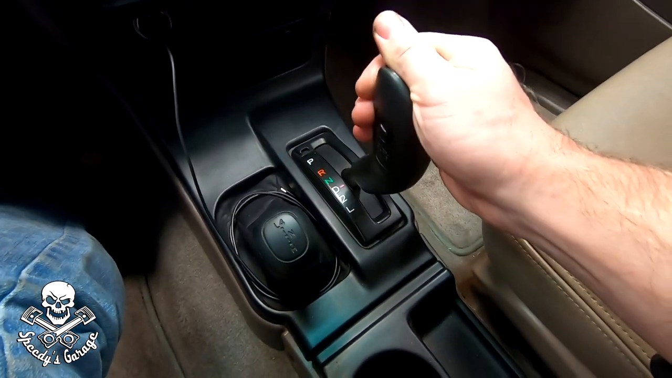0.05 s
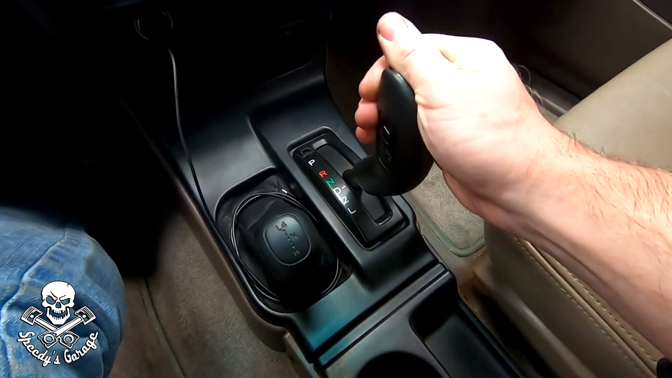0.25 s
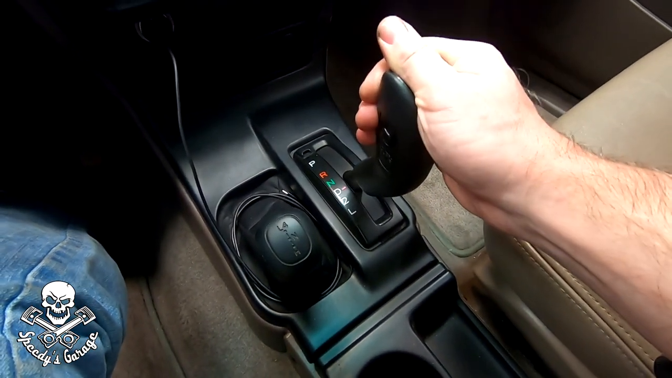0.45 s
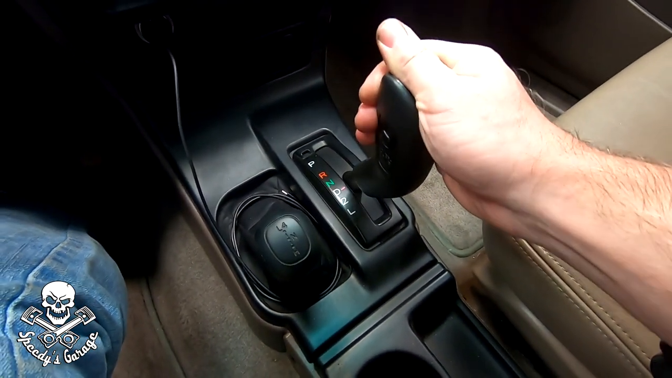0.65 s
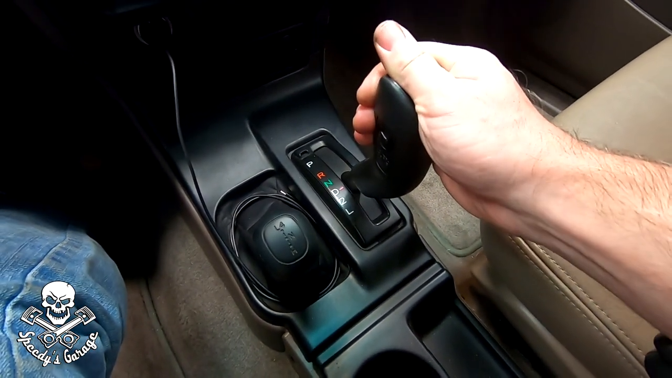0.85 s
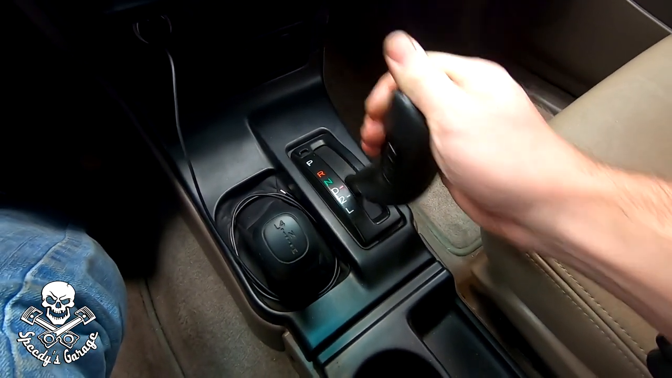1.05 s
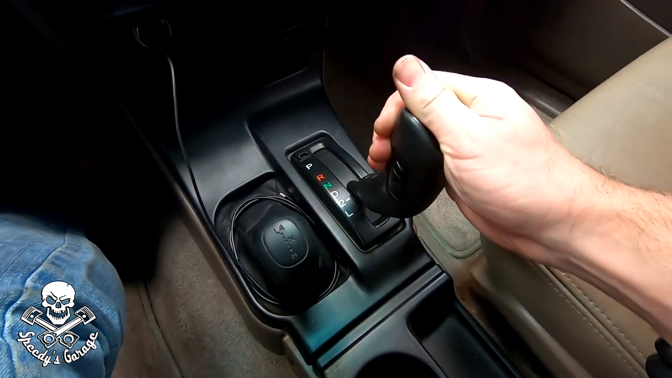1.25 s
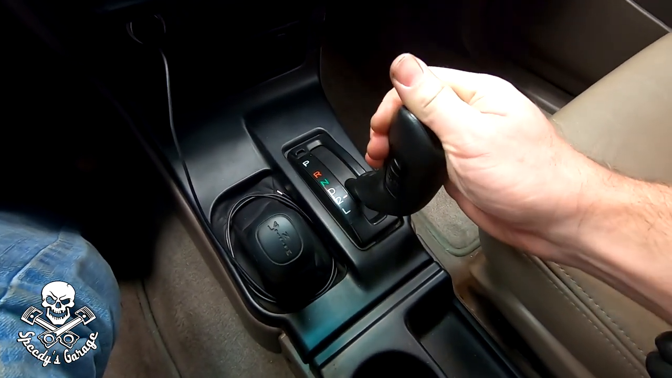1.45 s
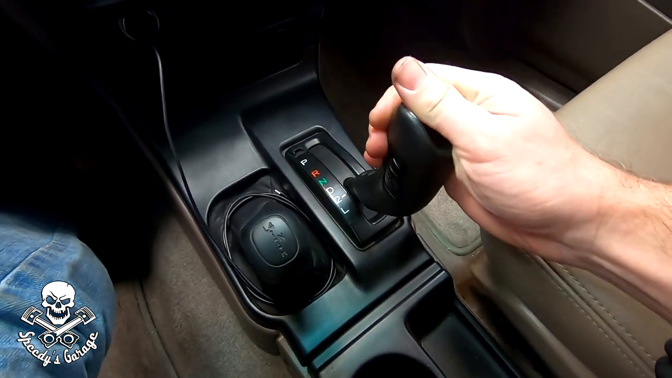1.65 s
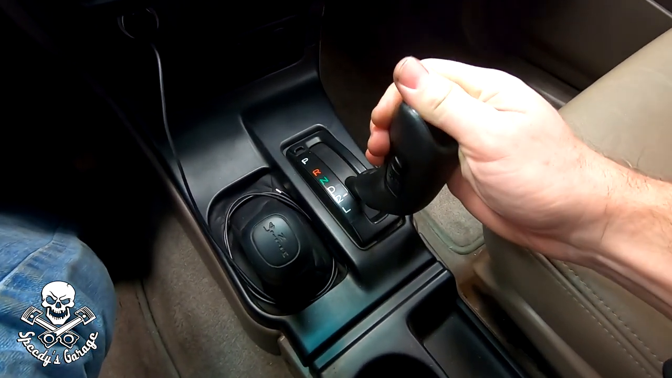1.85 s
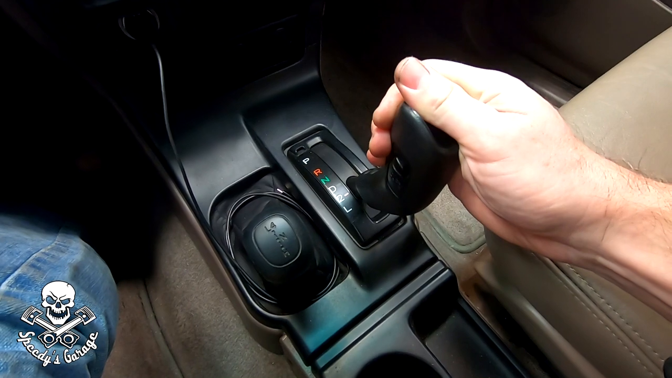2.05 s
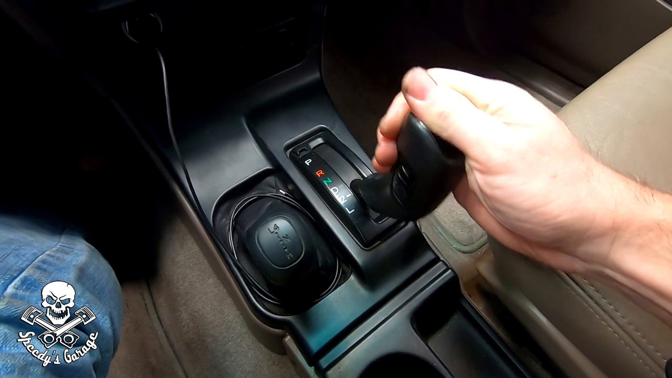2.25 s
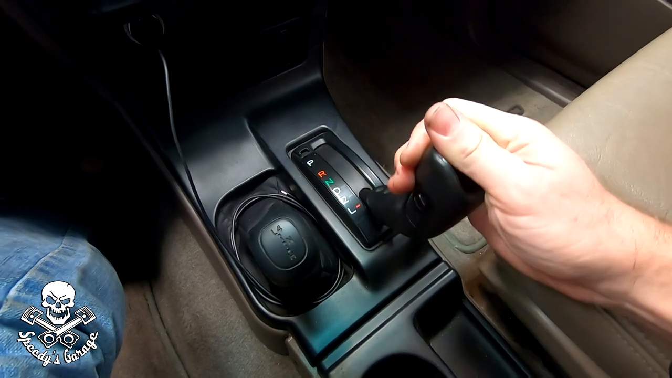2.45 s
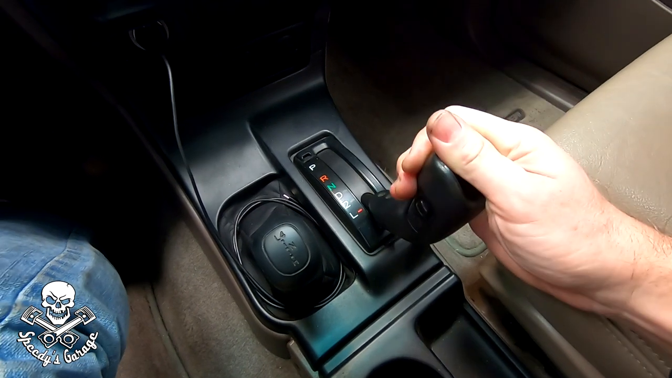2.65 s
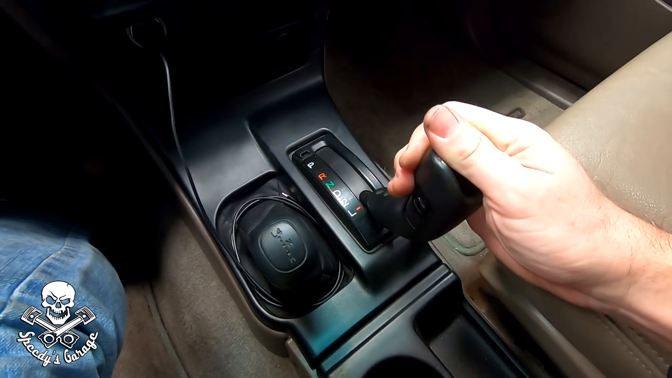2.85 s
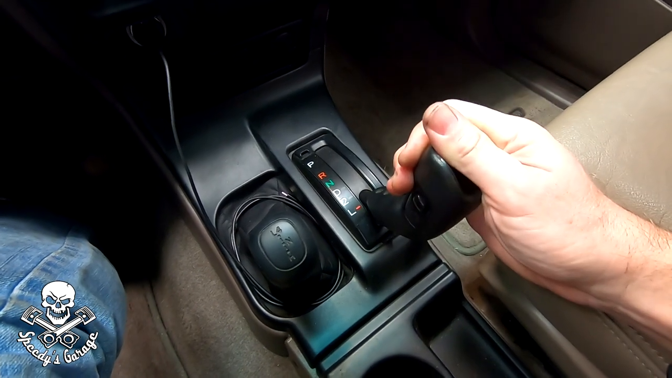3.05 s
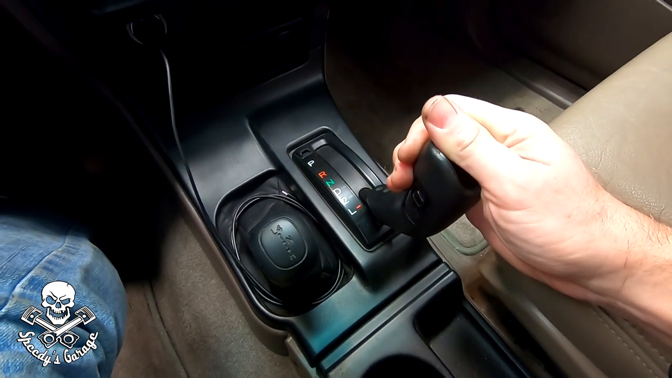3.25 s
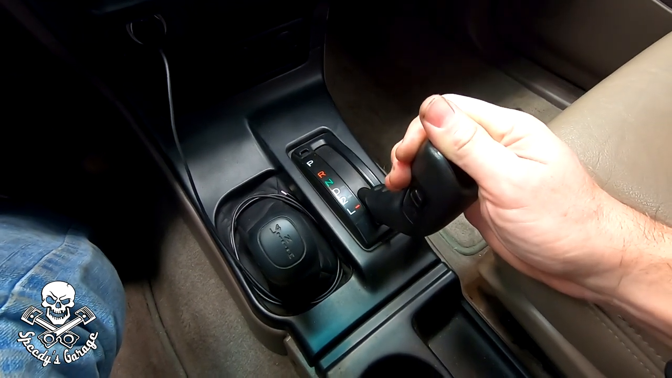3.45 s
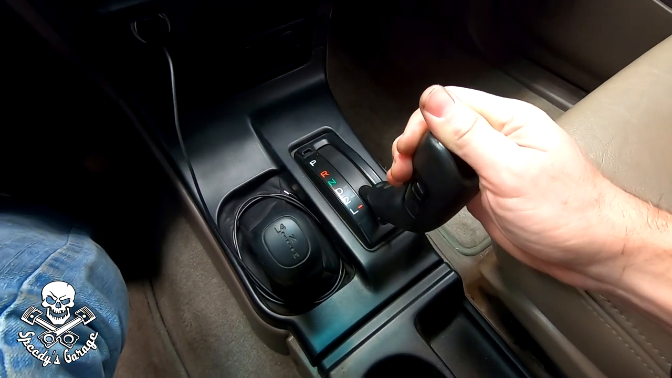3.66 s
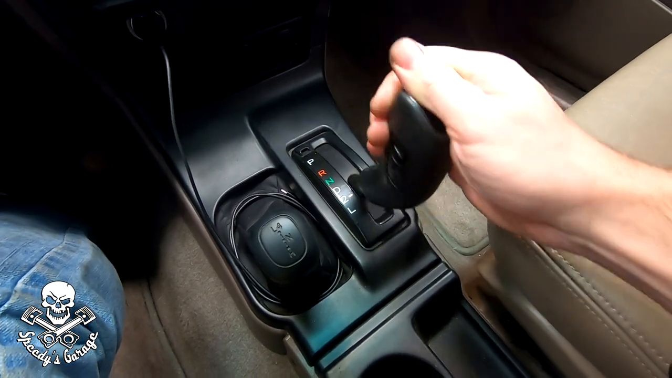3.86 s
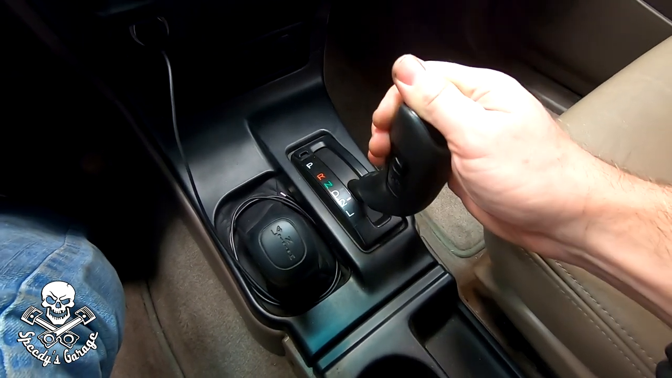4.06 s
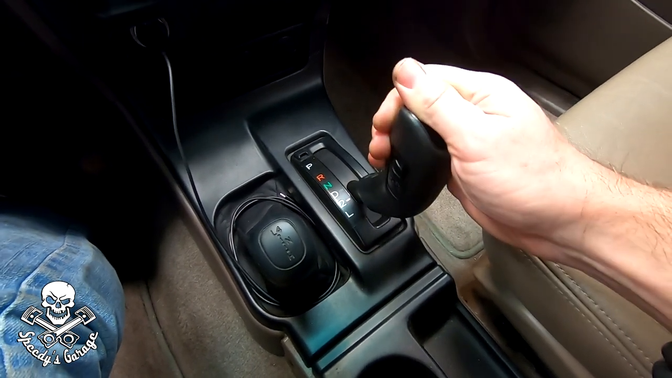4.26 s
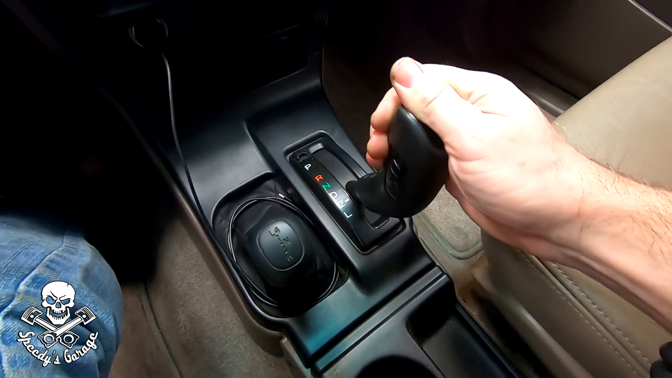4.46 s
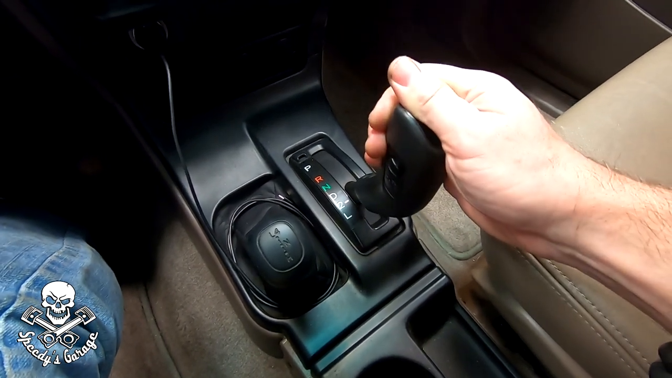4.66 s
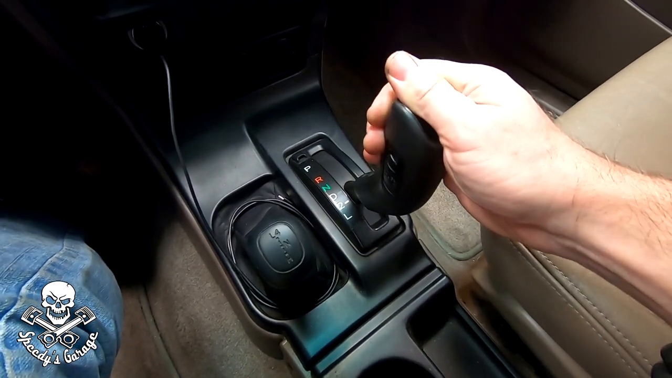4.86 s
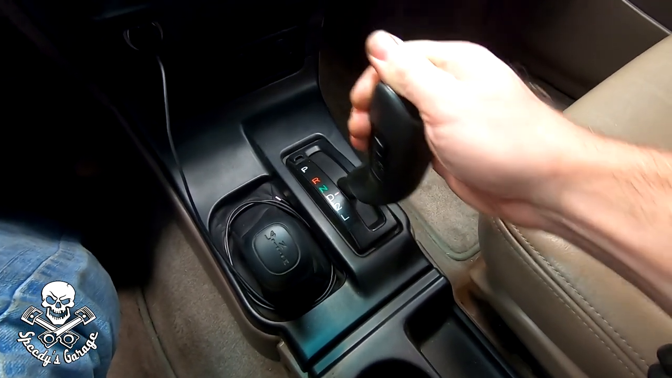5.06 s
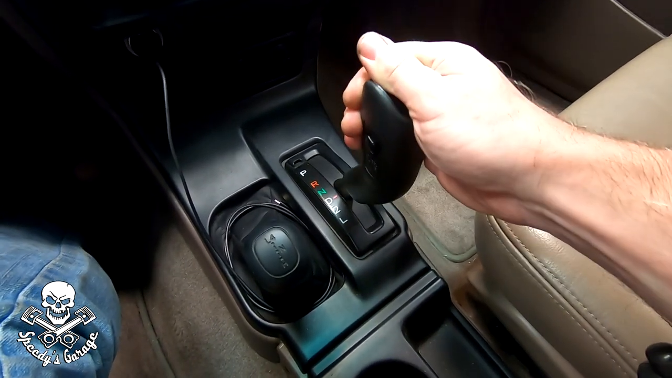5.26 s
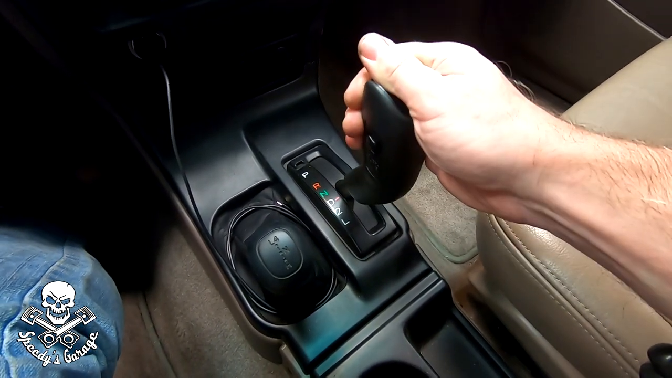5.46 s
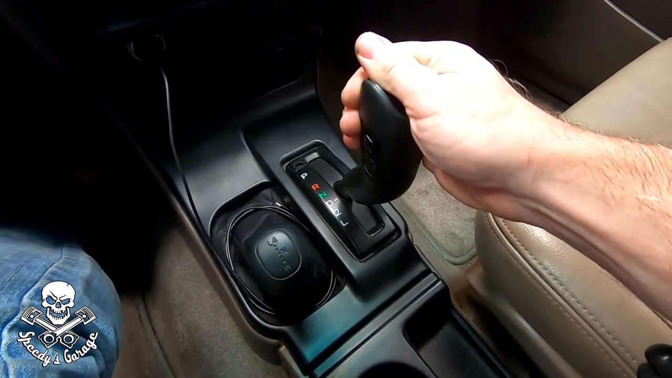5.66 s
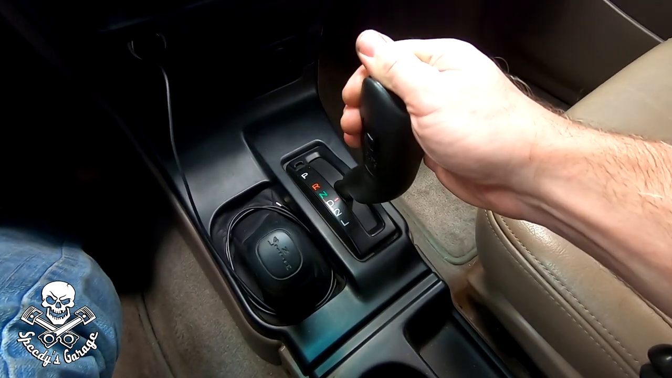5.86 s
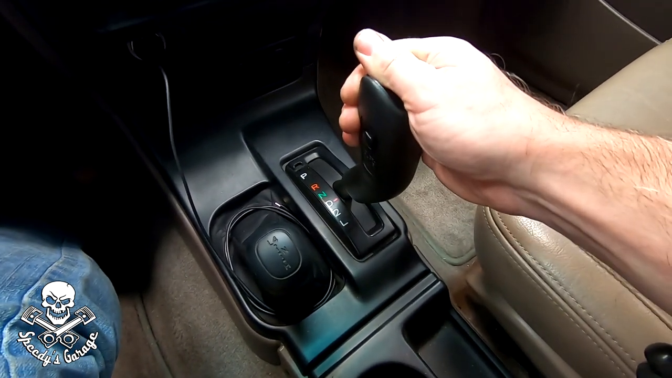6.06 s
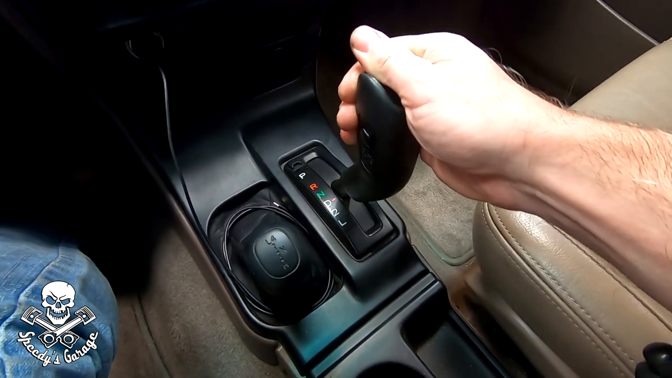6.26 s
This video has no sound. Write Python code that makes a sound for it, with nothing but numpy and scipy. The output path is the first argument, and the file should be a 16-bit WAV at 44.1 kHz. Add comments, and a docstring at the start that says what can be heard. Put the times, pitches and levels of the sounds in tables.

```python
"""In a parked car, two deep bumps and a surge of rumble open the scene as the engine sinks to idle.
The engine's speed sets its low throb, its muffled hiss and the pitch of an airy whistle.
An automatic gear lever is then pulled back two steps and, among light ticks, pushed forward two.
At each step the detent slips off one notch and lands in the next; the harder of these two contacts
rebounds, knocks the lever and booms the floor pan."""
import sys
import numpy as np
from scipy import signal
from scipy.fft import rfft, irfft, next_fast_len
from scipy.io import wavfile

SR = 44100
rng = np.random.default_rng(int(sys.argv[2]) if len(sys.argv) > 2 else 0)


def inscribe(sig):
    """Save sig as 16-bit PCM at rate SR to the path in sys.argv[1].

    A 1-D sig is mono; a 2-D sig holds one channel per row.
    Samples are clipped to [-1, 1] before scaling.
    """
    pcm = np.round(np.clip(np.atleast_2d(sig).T, -1, 1) * 32767)
    wavfile.write(sys.argv[1], SR, pcm.astype(np.int16))


N = 278712
TIME = np.arange(N) / SR   # seconds

# Steps of the lever, two back and two forward. Each row: start in seconds, travel to the next notch in
# seconds, bite of the release in dB, bite of the landing in dB, body of the landing in dB, sparkle of the
# landing in dB above its bite, sparkle of the rebound in dB above its bite, clack in Hz, clack peak in dB,
# thud in Hz, thud peak in dB, swell of both (half the cycles they take to peak), floor boom in dB.
LEVER_STEPS = [(1.0632, 0.014, -24.5, -11.5, -17, -6, -10, 430, -12.5, 347, -13.5, 0.46, -22),
               (2.3013, 0.009, -24, -10, -15.5, -10, 6, 920, -19.5, 268, -16, 0.85, -12),
               (3.8030, .0190, -20, -21, -20, 1, -11, 600, -30, 360, -6.5, 0.95, -16),
               (5.0615, .0168, -18, -19.5, -18, -5, 0, 626, -17.5, 352, -6.5, .95, -14)]
# Light ticks of play in the lever. Each row: start in seconds, bite in dB, body in dB above the bite,
# sparkle in dB above the bite.
LEVER_TICKS = [(3.117, -53, -10, 4), (3.5275, -40, -1, -8), (3.6722, -37, -2, -7), (3.7475, -42, -7, -7),
               (3.8990, -34, 5.5, -13), (3.9085, -36.5, 6, -5), (3.9125, -32.5, 4, -27),
               (5.321, -42, 4, -12)]
# Colour of the snap of one contact. Each row: frequency in Hz, relative level in dB.
SNAP_COLOUR = [(300, 14.5), (600, 12), (900, 1.5), (1300, 6.5), (2200, 3), (3700, -1.5), (5500, 0),
               (7500, -4), (12000, -7), (13500, -18), (16000, -24)]
# How fast the snap dies away. Each row: frequency in Hz, time to fall by 60 dB in seconds.
SNAP_DECAY = [(300, .05), (1200, .04), (3000, .028), (8000, .021), (16000, .018)]
# Ringing tones of the plastic console. Each row: frequency in Hz, relative level in dB, longest time to
# fall by 60 dB in seconds.
CONSOLE_TONES = [(572, -7, 0.072), (680, 0.5, 0.093), (942, -14.5, 0.18), (1248, 1.5, 0.048),
                 (1398, 1, 0.041), (2130, -25, 0.073), (2057, -5.5, 0.042), (2410, -7, 0.072),
                 (3266, -3.5, 0.069), (3950, -17, 0.27), (4430, -4.5, 0.28), (4880, -1, 0.074),
                 (5400, -26, 0.055), (6200, -31, 0.055), (6700, -9, 0.029), (7400, -47, 0.15),
                 (9040, 1, 0.17), (10200, -3, 0.015), (11900, -2, 0.044)]
# Ringing of floor pan and cabin air. Each row: frequency in Hz, relative level in dB, time to fall by
# 60 dB in seconds.
FLOOR_TONES = [(56.4, -5.5, 0.33), (82.2, 0, 0.19), (141.2, -5.5, 0.13), (232, -12, 0.18)]
# Deep bumps under the opening surge. Each row: start in seconds, frequency in Hz, peak level in dB.
DEEP_BUMPS = [(0.021, 56.7, -17.5), (.088, 42.4, -15)]
# The engine settles, and sags a little on the way forward. Each row: time in seconds, firings per second,
# rms level of the broad part of the whistle in dB (before the hum of the engine pulses it).
ENGINE_SPEED = [(0, 44.4, -51.5), (.42, 41.6, -51.5), (1.0, 35.5, -56), (1.8, 35.55, -52.5),
                (3.6, 35.1, -55.5), (4.1, 33.3, -49.5), (5.6, 34.5, -53.5), (6.32, 36.3, -55)]
# Hum of the engine. Each row: multiple of the crank's turning rate, rms level in dB before surge and waver.
CRANK_ORDERS = [(1, -37.5), (3, -43), (4, -54.5), (5, -48), (6, -50), (7, -51.5), (8, -55), (12, -57.5),
                (15, -64)]
# Colour of the engine rumble. Each row: frequency in Hz, relative level in dB per Hz.
RUMBLE_COLOUR = [(7.1, 5), (12, 13), (28, -1), (48, -31.5), (65, -6.5), (99, -14), (132, -15.5), (168, -22),
                 (205, -19), (242, -22.5), (303, -23), (450, -29), (580, -55), (990, -120)]
# Colour of the engine bay heard through the bulkhead. Each row: frequency in Hz, relative level in dB per Hz.
HISS_COLOUR = [(300, 2.5), (450, -2.5), (560, -1), (680, -4), (780, -5.5), (930, -9.5), (1300, -4),
               (1800, -7), (2300, -12.5), (3100, -14.5), (4300, -16), (5800, -27.5), (9000, -31.5),
               (16000, -39)]
# Resonances of engine bay and panels. Each row: frequency in Hz, width in Hz, rms level at idle in dB
# before waver.
BAY_RESONANCES = [(321, 27, -56.5), (545, 34, -58.5), (774.5, 17, -61.5), (1257, 19, -61), (1438, 7.7, -59),
                  (1690, 19, -65.5), (2096, 10, -64.5), (2508, 30, -63), (3070, 120, -65), (3474, 13, -68),
                  (4130, 110, -69), (5480, 80, -74.5), (7090, 220, -77), (9200, 200, -84.5)]

# A contact's colour is set at three places: body, bite and sparkle.
BODY_HZ, BITE_HZ, SPARKLE_HZ = 1300, 5460, 9900
# Every release has the same body and sparkle.
RELEASE_BODY_DB, RELEASE_SPARKLE_DB = -20, -29
# The harder contact rebounds once, with more body than bite: delay, bite, body above the bite.
REBOUND_S, REBOUND_DB, REBOUND_BODY_DB = 0.0036, -25, 9
# The blow travels from the lever down to the floor: delays after the harder contact.
CLACK_LAG_S, THUD_LAG_S, BOOM_LAG_S = 0.00075, 0.00557, 0.01022
# The lever rocks back with a weaker, lower thud: delay and level after the first, share of its pitch.
ROCK_S, ROCK_DB, ROCK_PITCH = 0.02115, -12.5, 0.83
# The cabin's tail on a contact, relative to the snap.
CABIN_T60_S, CABIN_DB = 0.19, -21
BUMP_SWELL_CYCLES = 0.41   # half the cycles a bump takes to peak

IDLE_HZ = 35.17   # firing rate at idle
# The cabin booms when the firing rate passes its resonance: centre, half width, rms level at the centre.
THROB_HZ, THROB_HALF_WIDTH_HZ, THROB_DB = 41.0, 1.25, -25
RUMBLE_DB = -32.5   # before the surge
SURGE_DB, SURGE_S = 20.5, 0.1   # height of the opening surge, and time constant of its fall in dB
HISS_DB, HISS_DB_PER_OCTAVE = -42.5, 7.5   # level at idle, growth with engine speed
WHISTLE_PER_FIRING = 40   # cycles of the whistle per firing
CUTOFF_HZ = 16000


def from_db(db):
    """Decibels to gain."""
    return 10 ** (np.asarray(db) / 20)


def rms_one(x):
    """Scale to rms 1."""
    return x / np.sqrt(np.mean(x ** 2) + 1e-20)


def in_time(rows):
    """Draw each column of a timed table as a curve with a value at every sample."""
    seconds, *columns = np.transpose(rows)
    return [np.interp(TIME, seconds, column) for column in columns]


def at_hz(points, hz):
    """Read a table at any frequency, on a log-frequency axis."""
    freqs, values = np.transpose(points)
    return np.interp(np.log(hz + 1e-9), np.log(freqs), values)


def drift(rate_hz):
    """Slow random wandering of rms 1, made at a 40th of the sample rate by smoothing noise."""
    step, warm_up = 40, 2000
    r = np.exp(-2 * np.pi * step * rate_hz / SR)
    raw = rng.standard_normal(N // step + warm_up + 2)
    slow = signal.lfilter([1], [1, -2 * r, r * r], raw)[warm_up:]
    return np.interp(np.arange(N) / step, np.arange(len(slow)), rms_one(slow))


def noise(colour):
    """Steady noise of a given colour, rms 1."""
    size = next_fast_len(N)
    hz = np.arange(size // 2 + 1) * SR / size
    spectrum = rfft(rng.standard_normal(size)) * from_db(at_hz(colour, hz))
    return rms_one(irfft(spectrum, size)[:N])


def narrow_noise(hz, width_hz):
    """A blurred tone round a centre that may move, rms about 1."""
    phase = 2 * np.pi * np.cumsum(hz * np.ones(N)) / SR
    return drift(width_hz) * np.cos(phase) + drift(width_hz) * np.sin(phase)


def decay(t, t60):
    """Falls by 60 dB in t60 seconds."""
    return np.exp(-np.log(1000) * t / t60)


def add(out, s, sound):
    """Mix a sound in at time s."""
    start = round(s * SR)
    out[start:start + len(sound)] += sound[:N - start]


def shifts(bands):
    """The detent releases and lands; the harder contact rebounds, clacks, thuds and booms the floor."""
    out = np.zeros(N)
    for (s, travel_s, release_db, landing_db, landing_body_db, landing_sparkle_db, rebound_sparkle_db,
         clack_hz, clack_db, thud_hz, thud_db, swell, boom_db) in LEVER_STEPS:
        landing_s = s + travel_s
        release = contact(bands, RELEASE_BODY_DB, release_db, RELEASE_SPARKLE_DB)
        landing = contact(bands, landing_body_db, landing_db, landing_db + landing_sparkle_db)
        rebound = contact(bands, REBOUND_DB + REBOUND_BODY_DB, REBOUND_DB, REBOUND_DB + rebound_sparkle_db)
        add(out, s, release)
        add(out, landing_s, landing)
        # the contact with the stronger bite sets off the rest
        blow_s = landing_s if landing_db > release_db else s
        thud_s = blow_s + THUD_LAG_S
        add(out, blow_s + REBOUND_S, rebound)
        add(out, blow_s + CLACK_LAG_S, knock(clack_hz, clack_db, swell))
        add(out, thud_s, knock(thud_hz, thud_db, swell))
        add(out, thud_s + ROCK_S, knock(ROCK_PITCH * thud_hz, thud_db + ROCK_DB, swell))
        add(out, blow_s + BOOM_LAG_S, boom(boom_db))
    return out


def ticks(bands):
    """The lever ticks lightly as the hand takes up its play."""
    out = np.zeros(N)
    for s, bite_db, body_db, sparkle_db in LEVER_TICKS:
        add(out, s, contact(bands, bite_db + body_db, bite_db, bite_db + sparkle_db))
    return out


def contact(bands, body_db, bite_db, sparkle_db, rise_s=0.00025, ring_db=-14, snap_db=-1,
            crack_db=5, crack_hz=3000, ring_cycles=230):
    """A hard contact cracks, shakes the dense modes of the linkage, rings the console and dies in the cabin."""
    t = TIME[:SR // 5]
    impulse = np.sqrt(SR / 1000) * (np.arange(len(t)) == SR // 2000)   # one click after half a millisecond
    colour = [(BODY_HZ, body_db), (BITE_HZ, bite_db), (SPARKLE_HZ, sparkle_db)]
    sound = np.zeros(len(t))
    for k, (band_filter, hz) in enumerate(bands):
        # the crack favours the treble; its sign alternates so that neighbouring bands start in step
        crack = (-1) ** k * from_db(crack_db) * hz / (hz + crack_hz) * impulse
        tail = from_db(CABIN_DB) * decay(t, CABIN_T60_S)
        envelope = decay(t, at_hz(SNAP_DECAY, hz)) + tail
        grain = envelope * (1 - np.exp(-t / rise_s)) * rng.choice([-1, 1], len(t))
        gain = from_db(snap_db + at_hz(SNAP_COLOUR, hz) + at_hz(colour, hz))
        sound += gain * signal.sosfilt(band_filter, crack + grain)
    for hz, db, t60 in CONSOLE_TONES:
        level_db = ring_db + db + at_hz(colour, hz) + rng.normal(0, 1)
        strength = rng.choice([-1, 1]) * from_db(level_db)
        held_t60 = min(t60, ring_cycles / hz)   # the grip damps the highest modes
        sound += strength * decay(t, held_t60) * np.sin(2 * np.pi * hz * t)
    return sound


def band_bank():
    """Filters that each pass about a third of an octave, with their centres in Hz."""
    edges = np.geomspace(250, 17000, 19)
    bands = []
    for low, high in zip(edges, edges[1:]):
        band_filter = signal.butter(2, (low, high), "band", fs=SR, output="sos")
        bands.append((band_filter, np.sqrt(low * high)))
    return bands


def knock(hz, peak_db, swell_cycles):
    """A cushioned blow is a low tone that swells and dies within a few cycles."""
    cycles = hz * TIME[:SR // 6]
    age = cycles / (2 * swell_cycles)   # 1 at the peak
    envelope = (age * np.exp(1 - age)) ** 3
    return from_db(peak_db) * envelope * np.sin(2 * np.pi * cycles)


def boom(level_db, rise_s=0.0022):
    """The floor pan rings under the console in a few low, fading tones."""
    t = TIME[:SR // 2]
    pan = sum(from_db(db) * decay(t, t60) * np.sin(2 * np.pi * hz * t) for hz, db, t60 in FLOOR_TONES)
    return -from_db(level_db) * (1 - np.exp(-t / rise_s)) * pan


def bumps():
    """Soft, deep bumps in the cabin."""
    out = np.zeros(N)
    for s, hz, db in DEEP_BUMPS:
        add(out, s, knock(hz, db, BUMP_SWELL_CYCLES))
    return out


def engine(waver_db=3.5, pulsing=0.021, lumpy_db=2.5, shake=0.21, bay_waver_db=1.5):
    """Crank hum and rumble come through the body; rumble, hiss and whistle swell at each firing."""
    firing_hz, whistle_db = in_time(ENGINE_SPEED)
    crank = np.pi * np.cumsum(firing_hz * (1 + 0.0089 * drift(5.9))) / SR   # two firings a turn
    firing = np.cos(2 * crank)

    hum = np.zeros(N)
    for order, db in CRANK_ORDERS:
        level = from_db(db + waver_db * drift(1.97))
        hum += np.sqrt(2) * level * np.sin(order * crank + 2 * np.pi * rng.random())

    resonance = 1 / np.hypot(1, (firing_hz - THROB_HZ) / THROB_HALF_WIDTH_HZ)
    throb = np.sqrt(2) * resonance * from_db(THROB_DB + 1.7 * drift(11)) * np.sin(2 * crank)

    uneven = from_db(lumpy_db * drift(31)) * (1 + shake * firing)   # firings vary in strength
    rumble = from_db(RUMBLE_DB) * rms_one(uneven * noise(RUMBLE_COLOUR))
    surge = from_db(SURGE_DB * np.exp(-TIME / SURGE_S))

    hiss = from_db(HISS_DB) * noise(HISS_COLOUR)
    for hz, width_hz, db in BAY_RESONANCES:
        hiss += from_db(db + bay_waver_db * drift(0.5)) * narrow_noise(hz, width_hz)
    hiss_growth = from_db(HISS_DB_PER_OCTAVE * np.log2(firing_hz / IDLE_HZ))
    airy = hiss_growth * hiss + intake(firing_hz, whistle_db)
    return throb + surge * (hum + rumble) + airy * (1 + pulsing * firing)


def intake(firing_hz, level_db, width_hz=76, core_width_hz=16, core_db=-7.5, overtone_db=-11):
    """A breathy whistle with a narrow core and a faint octave; its pitch follows the engine speed."""
    hz = WHISTLE_PER_FIRING * firing_hz
    breath = narrow_noise(hz, width_hz)
    core = from_db(core_db) * narrow_noise(hz, core_width_hz)
    octave = from_db(overtone_db) * narrow_noise(2 * hz, 2 * width_hz)
    return from_db(level_db) * (breath + core + octave)


def scene():
    """The lever is close; the engine is behind the bulkhead."""
    bands = band_bank()
    return (shifts(bands) + ticks(bands) + bumps() + engine())[None]


def record(dry):
    """The top of the treble is cut steeply."""
    low_pass = signal.ellip(10, 0.1, 80, CUTOFF_HZ, fs=SR, output="sos")
    return signal.sosfilt(low_pass, dry)


dry = scene()
out = record(dry)
inscribe(out)
```